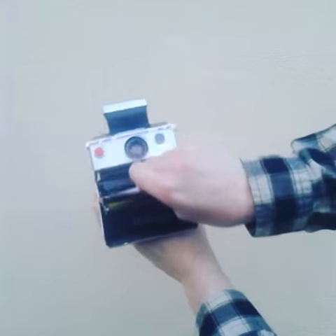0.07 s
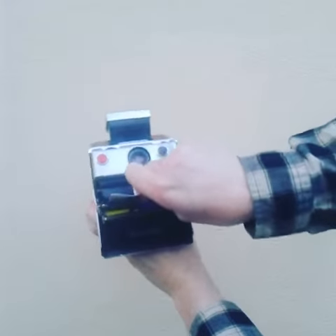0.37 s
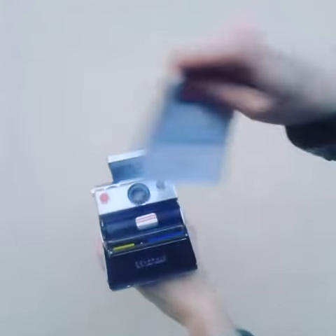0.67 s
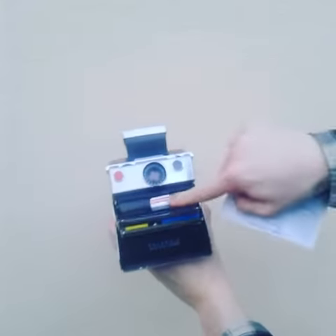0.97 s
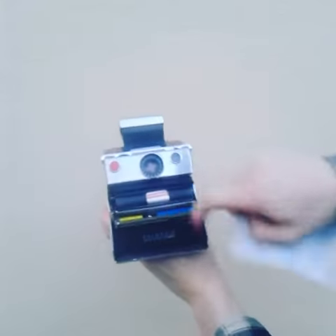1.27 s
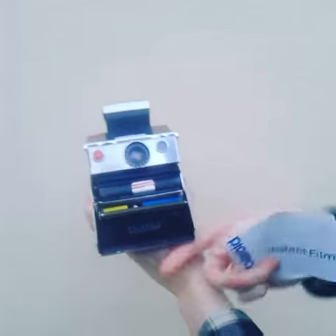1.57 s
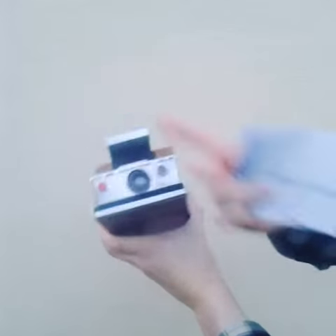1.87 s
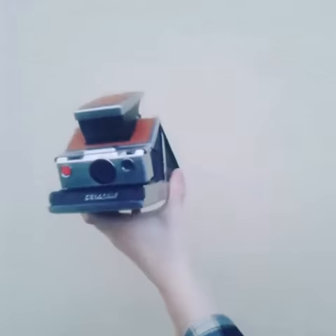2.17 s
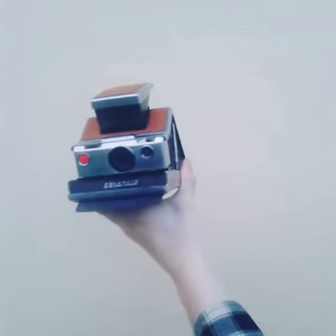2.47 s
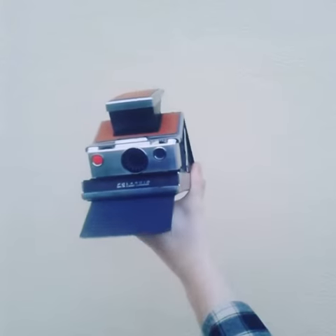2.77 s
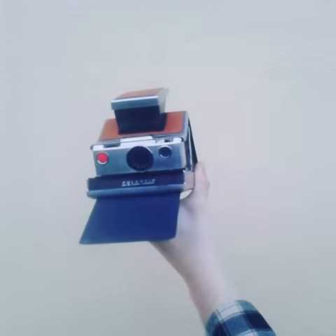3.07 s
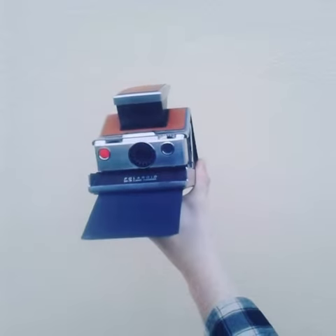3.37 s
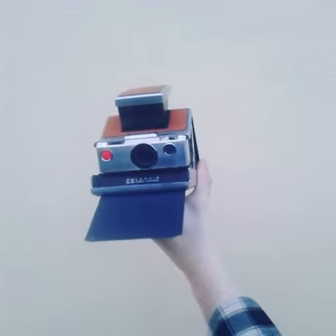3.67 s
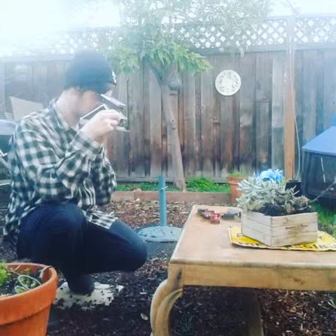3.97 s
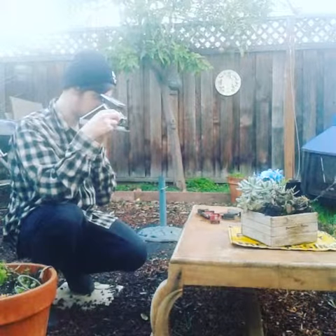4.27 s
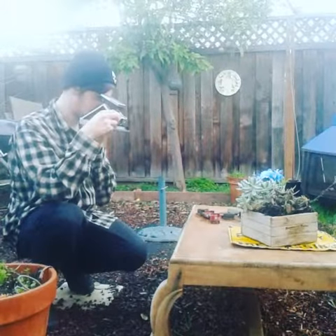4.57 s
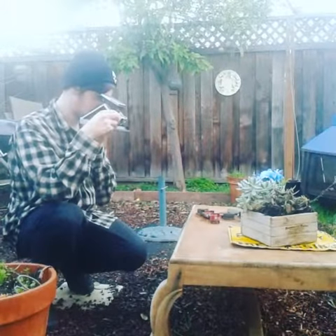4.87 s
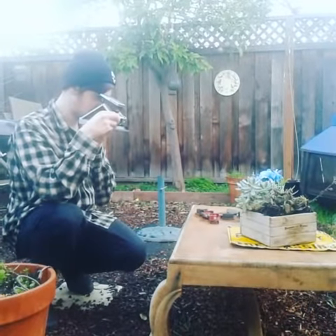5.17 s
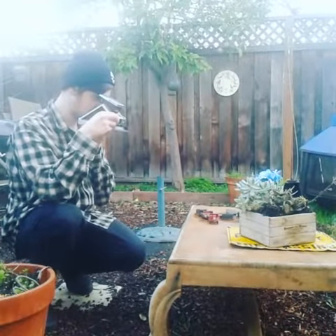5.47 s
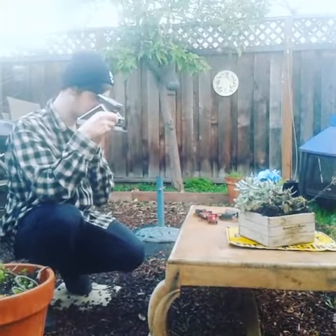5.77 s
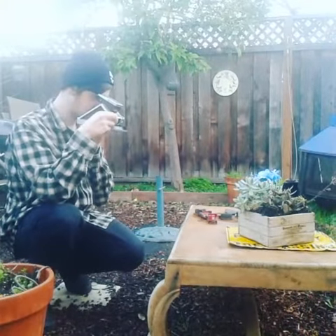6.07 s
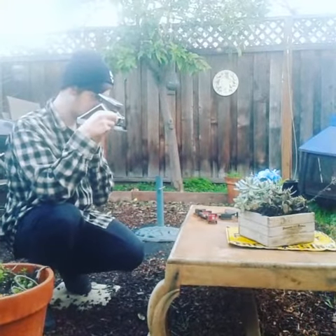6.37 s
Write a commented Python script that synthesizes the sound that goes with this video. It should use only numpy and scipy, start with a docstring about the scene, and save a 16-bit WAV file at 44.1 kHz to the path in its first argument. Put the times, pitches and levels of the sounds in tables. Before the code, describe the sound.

Close to the microphone in a quiet room, hands work an instant camera with light plastic clicks, taps and a sliding, flicking card. Its door snaps shut with a loud clack, and a small motor whines and rattles through its gears, pushing out a sheet before stopping with sharp clicks. The room cuts off, and a quiet back yard fades in with faint, distant traffic.

```python
"""Close plastic clicks and a sliding, flicking card: hands work a folding instant camera and snap its
front door shut, each contact ringing the shell and knocking the hollow body. A small motor hums and winds
a whining, rattling gear train, pushes a sheet through the rollers, trips a lever and stops, leaving a
spring ringing. The room tone cuts off and a quiet back yard fades in, with far traffic droning."""
import sys
import numpy as np
from scipy import signal
from scipy.fft import rfft, irfft, next_fast_len
from scipy.io import wavfile
from scipy.ndimage import uniform_filter1d, map_coordinates

SR = 44100
rng = np.random.default_rng(int(sys.argv[2]) if len(sys.argv) > 2 else 0)


def wav_record(signal):
    """Record a signal, one row per channel, as 16-bit PCM in the file named by sys.argv[1]."""
    frames = np.transpose(np.atleast_2d(signal))
    bounded = np.clip(frames, -1, 1)
    # unit amplitude maps onto the largest positive 16-bit level
    quanta = np.round(bounded * 32767).astype(np.int16)
    wavfile.write(sys.argv[1], SR, quanta)


N = 283563

# The motor sags under load and races once the sheet is free: (time [s], speed [turns/s])
MOTOR_SPEED = [(1.84, 147), (1.92, 160), (2.0, 180), (2.04, 171), (2.09, 178), (2.15, 145.6), (2.22, 180),
               (2.28, 158), (2.41, 173.6), (2.56, 164), (2.7, 171), (2.92, 173.6), (3.08, 193.6),
               (3.33, 196), (3.42, 175)]
# Wind-up, pick-up, rollers bite, hum drops out, sheet rolls, edge passes, sheet free, run-out, slack:
# (start [s], rattle [dB], whine [dB], second tooth harmonic boost [dB], hum at median speed [dB])
MOTOR_STAGES = [(1.83, -41, -46.5, -1, -56), (2.05, -37, -32, -2.5, -45.5), (2.18, -36, -35.5, 6, -46.5),
                (2.43, -35, -40, 4, -70), (2.57, -35.6, -36, -4, -45), (2.91, -34, -38.5, -4, -44.5),
                (3.03, -37, -35, -8, -46), (3.22, -36.5, -34, -9, -50.5), (3.335, -36, -41, -6, -57.5)]
# Shaft buzz: (multiple of the turn rate, relative level [dB])
SHAFT_HARMONICS = [(4, -26.5), (7, -24.5), (8, -30), (9, -25), (11, -23), (12, -19.5), (13, -21.5),
                   (14, -25)]
# Gear whine: (multiple of the tooth rate, relative level [dB])
TOOTH_HARMONICS = [(1, -10), (2, -7), (3, 1), (6, 1)]
# Gear frame resonances: (frequency [Hz], width [Hz], gain [dB])
FRAME_MODES = [(2343, 400, 0.5), (4155, 530, 1), (6250, 330, 0)]
# Hard hits of latches, door and levers:
# (time [s], shell ring [dB], hollow knock [dB], crack [dB], ring centre [Hz], knock centre [Hz])
HARD_HITS = [(0.001, -27, -55, -37.5, 2100, 590), (0.1556, -26.5, -40.5, -33.5, 2580, 650),
             (0.5401, -36, -24.5, -38, 2457, 900), (0.5478, -15.5, -30, -29, 4210, 800),
             (0.566, -37, -40.5, -50.5, 5770, 520), (0.8324, -32.5, -48, -43, 2030, 480),
             (1.171, -27, -38, -37, 3330, 690), (1.18, -36, -37, -36, 4270, 490),
             (1.199, -44, -49, -44.5, 3940, 470), (1.324, -30, -58, -44, 3400, 660),
             (1.331, -28.5, -44.5, -25.5, 2230, 590), (1.815, -30.5, -55.5, -43, 4927, 350),
             (1.829, -11.5, -17, -20, 2362, 456), (1.84, -13, -24, -22.5, 2245, 484),
             (1.849, -28, -27.5, -35.5, 2415, 420), (1.9494, -21, -35, -29, 3000, 573),
             (2.045, -15.5, -16, -29.5, 2200, 470), (2.0518, -18.5, -21, -36, 3284, 480),
             (2.123, -23.5, -36, -31, 4870, 451), (2.9248, -19, -36.5, -27.5, 4064, 450),
             (2.947, -20.5, -32.5, -33, 3280, 520), (2.9939, -10.5, -31.5, -26.5, 2426, 616),
             (3.0142, -12, -33.5, -21.5, 2000, 430), (3.3276, -15, -33.5, -20.5, 4670, 860)]
# Soft fingertips on the shell: (time [s], ring level [dB])
FINGER_TAPS = [(0.103, -41.5), (0.6084, -40.5), (0.728, -43.5), (0.7596, -42), (0.876, -35.5),
               (0.887, -36.5), (0.931, -44), (0.956, -42.5), (0.9895, -44.5), (1.318, -38.5), (1.54, -51.5)]
# The card snapping past an edge: (time [s], relative level [dB], pitch [Hz])
CARD_FLICKS = [(0.1952, -20.5, 2570), (0.2188, -26.5, 2500), (0.2374, -35.5, 2570), (0.241, -37, 2540),
               (0.541, -20.5, 847), (0.661, -29.5, 2440), (0.6753, -35.5, 2520), (0.682, -38, 2310)]
# The card's ring: (multiple of the pitch, relative level [dB], t60 [s])
CARD_MODES = [(.94, 2.5, 0.035), (1, 2, 0.033), (1.07, 3.5, 0.029), (1.76, -5, 0.038), (1.86, 3, .018),
              (2.25, -1, 0.015), (2.6, 0, 0.02), (3, -2, .01)]
# Struck parts: (frequency [Hz], relative level [dB], t60 [s])
SHELL_MODES = [(1350, -8.5, 0.028), (1600, -2.5, 0.042), (1778, -5.5, 0.063), (2074, 0.5, 0.018),
               (2255, -5, 0.061), (2597, -6, 0.068), (3000, -9, .03), (3540, -1, 0.022), (3580, -1, 0.024),
               (4410, -3.5, .025), (5294, 1, 0.031), (5560, -1.5, 0.023), (6235, 4, 0.039),
               (6460, -0.5, 0.033), (7370, -3.5, 0.067)]
BODY_MODES = [(195.7, -11, .06), (259.4, -3.5, 0.056), (339.5, -2.5, 0.061), (438, -1, 0.041),
              (520, -2, 0.027), (627, -4, 0.04), (885, 0, 0.018)]
LEVER_MODES = [(1596, 0.5, .12), (1654, -5.5, 0.087), (2115, -9.5, 0.059)]
SPRING_MODES = [(1836, -1.5, .4), (2207, -5.5, 1.9), (3702, -0.5, .33), (4766, -1, 0.31)]
# Friction gestures: (start [s], length [s], level [dB])
SHELL_STROKES = [(0.134, 0.031, -43), (0.28, 0.084, -61), (0.514, 0.037, -37.5), (0.7, .26, -61),
                 (0.765, 0.046, -55.5), (1.165, .006, -35.5), (1.305, 0.064, -58.5), (1.435, 0.015, -49.5),
                 (1.41, .08, -61)]
YARD_RUSTLES = [(4.29, .03, -74.5), (4.89, 0.036, -72)]
# Noise colours: (frequency [Hz], relative density [dB])
HOUSING_SPECTRUM = [(60, -10), (150, -8), (420, -10), (620, -13.5), (1020, -11.5), (1600, -3), (2300, -0.5),
                    (2800, -7.5), (3150, -8.5), (3700, -4), (4700, -5.5), (5700, -1), (6400, -5.5),
                    (7000, -8), (10000, -13.5), (13000, -20.5), (16000, -26)]
CRACK_SPECTRUM = [(1000, -20), (5000, -8.5), (7500, -0.5), (11000, -2), (16000, -15)]
CLATTER_SPECTRUM = [(150, -23.5), (700, -5.5), (1500, 0.5), (6500, -1.5), (8000, -9), (16000, -29)]  # the shell's dense, dead ringing
SCRAPE_SPECTRUM = [(200, -21), (700, -3.5), (1300, -3.5), (2400, 0.5), (3200, -2.5), (4500, -1),
                   (6400, 0.5), (8000, -10.5), (16000, -19)]
ROOM_SPECTRUM = [(25, -19.5), (55, 1), (120, 0.5), (200, -1), (340, -6), (600, -13), (900, -10),
                 (1500, -18), (2900, -28.5), (6400, -34), (16000, -37.5)]
YARD_SPECTRUM = [(15, -71), (25, -41), (36, -25), (59, -4.5), (92, -5.5), (157, -3.5), (200, -11.5),
                 (326, -16.5), (394, -22.5), (754, -17.5), (818, -19), (1070, -20), (2610, -36.5),
                 (14800, -46.5), (16000, -49)]
TRAFFIC_SPECTRUM = [(90, -40), (120, 6.5), (138, -24), (160, 10), (182, -19), (230, -40), (600, -100)]
# Reverb off the walls: (frequency [Hz], t60 [s])
WALL_DECAY = [(200, 0.36), (2000, 0.24), (10000, 0.046)]


def motor():
    """A three-pole motor hums, louder as load slows it; its twelve-tooth pinion drives the gears."""
    start_s, stop_s, coast_db_per_s, hum_db_per_lost_hz = 1.83, 3.345, 402, 0.22
    size = 2 * SR
    t = start_s + np.arange(size) / SR
    speed = np.interp(t, *np.transpose(MOTOR_SPEED))
    rattle_db, whine_db, boost_db, hum_db = stages(MOTOR_STAGES, t)
    running = amp(-coast_db_per_s * np.maximum(t - stop_s, 0))
    angle = 2 * np.pi * np.cumsum(speed) / SR
    strain_db = hum_db_per_lost_hz * (np.median(speed) - speed)
    hum = np.sqrt(2) * amp(hum_db + strain_db) * np.sin(3 * angle)
    shaft = sum(amp(db + 3.1 * wobble(17, size)) * np.sin(k * angle + 0.76 * wobble(35, size))
                for k, db in SHAFT_HARMONICS)
    teeth = 12 * angle
    # teeth meet early or late, and an off-centre pinion sways them once a turn
    backlash = .45 * wobble(80, size) + .42 * wobble(600, size) + .35 * np.sin(angle)
    whine = amp(whine_db) * gear_whine(teeth, backlash, boost_db)
    rattle = amp(rattle_db) * (gear_rattle(angle, teeth + backlash) + 1.86 * shaft)
    out = np.zeros(N)
    add(out, start_s, running * (hum + whine + rattle))
    return out


def gear_whine(teeth, backlash, boost_db):
    """Meshing teeth sing a raspy tone through the gear frame's resonances."""
    size = len(teeth)
    mesh = np.zeros(size)
    for k, db in TOOTH_HARMONICS:
        tone = np.sin(k * (teeth + backlash)) * amp(1.5 * wobble(200, size))
        rasp = .65 * wobble(650, size) * np.cos(k * teeth)
        mesh += amp(db + boost_db * (k == 2)) * (tone + rasp)
    return filtered(mesh, lambda hz: resonances(FRAME_MODES, hz))


def gear_rattle(angle, tooth_phase):
    """Each tooth knocks the housing at its own strength, harder once a turn; worn spots come round."""
    size = len(angle)
    flaws = rng.standard_normal(256)
    wear = np.interp(angle, np.linspace(0, 2 * np.pi, len(flaws), endpoint=False), flaws, period=2 * np.pi)
    grit = rng.standard_normal(size) + .4 * wear
    knocks = grit * (1 + 0.96 * np.cos(tooth_phase)) * amp(0.93 * wobble(830, size))
    return coloured(knocks, HOUSING_SPECTRUM) * amp(1.3 * np.sin(angle) + .9 * wobble(130, size))


def clacks():
    """Each latch hit or finger tap cracks, rings the shell and knocks the hollow body."""
    out, t = np.zeros(N), np.arange(SR // 12) / SR
    burst = attack(t, .0003) * (decay(t, 0.009) + amp(-14.5) * decay(t, 0.084))  # hit, then chatter
    taps = [(s, db, db - 4, db - 19.5, 2000, 430) for s, db in FINGER_TAPS]  # columns as in HARD_HITS
    for s, ring_db, knock_db, crack_db, ring_hz, knock_hz in HARD_HITS + taps:
        shell = ring(favouring(SHELL_MODES, ring_hz, db_per_octave=9.5), t, scatter_db=6.5)
        shell = unit_hit(shell * (1 + 2 * decay(t, 0.029)) * attack(t, 0.00057))
        clatter_colour = [(hz, db - 4 * abs(np.log2(hz / ring_hz))) for hz, db in CLATTER_SPECTRUM]
        clatter = unit_hit(noise(clatter_colour, len(t)) * burst)
        crack = unit_hit(noise(CRACK_SPECTRUM, len(t)) * burst * decay(t, .04))  # treble dies first
        body = ring(favouring(BODY_MODES, knock_hz, db_per_octave=10.5), t, scatter_db=4.5)
        knock = unit_hit(body * attack(t, 0.0012))
        ringing = unit_hit(shell + clatter)
        add(out, s, amp(ring_db) * ringing + amp(crack_db) * crack + amp(knock_db) * knock)
    return out


def card_flicks():
    """The stiff card snaps past an edge and rings briefly."""
    out, t = np.zeros(N), np.arange(SR // 10) / SR
    for s, db, pitch_hz in CARD_FLICKS:
        modes = [(k * pitch_hz, level, t60) for k, level, t60 in CARD_MODES]
        tone = unit_hit(ring(modes, t, scatter_db=5.0) * (1 + 0.56 * decay(t, 0.022)))
        snap = unit_hit(rng.standard_normal(len(t)) * decay(t, .008))
        add(out, s, amp(db - 5.5) * (tone + amp(-8.5) * snap))
    return out


def lever_and_spring():
    """The sheet trips a steel lever; the stop at the end of the cycle leaves a spring ringing."""
    out, t = np.zeros(N), np.arange(SR) / SR
    onset = attack(t, .0006)
    add(out, 3.015, amp(-19.5) * onset * ring(LEVER_MODES, t, scatter_db=1))
    add(out, 3.328, amp(-52.5) * onset * ring(SPRING_MODES, t, scatter_db=1))
    return out


def rubbing():
    """Card and fingers catch and slip over the shell in tiny grains."""
    attack_s, release_s = 0.0043, .009
    t = np.arange(N) / SR
    grains = rng.standard_normal(N) * amp(4.9 * wobble(2500))
    pressure = amp(2.4 * wobble(170))
    scrape = unit(coloured(grains, SCRAPE_SPECTRUM) * pressure)
    grip = amp(-63.5 - 7.5 * t)  # the shifting hand settles
    firm = swells(SHELL_STROKES, attack_s, release_s)
    brush = amp(-22) * swells(SHELL_STROKES, 3.6 * attack_s, 3.6 * release_s)  # soft edges of a stroke
    return np.sqrt(grip ** 2 + firm ** 2 + brush ** 2) * scrape


def room_reverb(x):
    """The walls answer, the treble dying first."""
    hz, t, spectra = signal.stft(rng.standard_normal(SR // 2), SR, nperseg=256)
    tail = signal.istft(spectra * decay(t, along(WALL_DECAY, hz)[:, None]), SR, nperseg=256)[1]
    return signal.fftconvolve(np.pad(x, (200, 0)), tail / np.linalg.norm(tail))[:N]


def yard():
    """Open air and the wavering drone of far traffic fade in and slowly swell, with faint rustles."""
    start_s, fade_s, swell_db_per_s = 4.025, 0.27, 1.34
    t = np.arange(N) / SR - start_s
    fader = np.clip(t / fade_s, 0, 1) ** 1.15 * amp(-55.5 + swell_db_per_s * t)
    air = amp(0.34 * wobble(14)) * noise(YARD_SPECTRUM)
    traffic = amp(-2.5 + 1.47 * wobble(7.4)) * noise(TRAFFIC_SPECTRUM)
    rustle = noise(SCRAPE_SPECTRUM) * amp(2.5 * wobble(60))
    return fader * (air + traffic) + swells(YARD_RUSTLES, attack_s=0.023, release_s=0.077) * rustle


def amp(db):
    """Decibels to gain."""
    return 10 ** (np.asarray(db) / 20)


def attack(t, rise_s):
    """A rise towards 1 with time constant rise_s."""
    return 1 - np.exp(-t / rise_s)


def decay(t, t60):
    """A fall of 60 dB every t60 seconds."""
    return amp(-60 * t / t60)


def unit(x):
    """Scale to rms 1."""
    return x / np.sqrt(np.mean(x ** 2) + 1e-20)


def unit_hit(x):
    """Scale a hit to the energy of one millisecond at level 1."""
    return x / np.sqrt(np.sum(x ** 2) * 1000 / SR)


def along(points, hz):
    """Read (frequency [Hz], value) points on a log axis."""
    freqs, values = np.transpose(points)
    return np.interp(np.log(hz + 1), np.log(freqs + 1), values)


def wobble(rate, size=N):
    """Smooth random modulation with rate knots a second."""
    knots = rng.standard_normal(int(size * rate / SR) + 4)
    fine = np.arange(0, len(knots) - 1, 1 / 6)
    return np.interp(np.arange(size) * rate / SR, fine, map_coordinates(knots, [fine]))


def filtered(x, response):
    """EQ x with a gain that is a function of frequency."""
    size = next_fast_len(len(x) + 8192)
    return irfft(rfft(x, size) * response(np.fft.rfftfreq(size, 1 / SR)), size)[:len(x)]


def coloured(x, spectrum):
    """Shape x with a spectrum, at rms 1."""
    return unit(filtered(x, lambda hz: amp(along(spectrum, hz))))


def noise(spectrum, size=N):
    """Coloured noise at rms 1."""
    return coloured(rng.standard_normal(size), spectrum)


def add(track, s, sound):
    """Mix a sound in at time s."""
    part = track[round(s * SR):][:len(sound)]
    part += sound[:len(part)]


def ring(modes, t, scatter_db):
    """Damped modes, struck at new strengths and phases each time."""
    hz, db, t60 = np.transpose(modes)[:, :, None]
    strength = amp(db + scatter_db * rng.standard_normal(hz.shape))
    phase = rng.uniform(0, 2 * np.pi, hz.shape)
    return np.sum(strength * decay(t, t60) * np.sin(2 * np.pi * hz * t + phase), axis=0)


def resonances(modes, hz):
    """Response of broad band-pass modes in alternating polarity."""
    return sum((-1) ** k * amp(db) * 1j * hz * width / (centre ** 2 - hz ** 2 + 1j * hz * width)
               for k, (centre, width, db) in enumerate(modes))


def favouring(modes, centre_hz, db_per_octave):
    """Where a hit lands favours the modes near one pitch."""
    return [(hz, db - db_per_octave * abs(np.log2(hz / centre_hz)), t60) for hz, db, t60 in modes]


def swells(gestures, attack_s, release_s):
    """Attack, hold and release envelopes, summed in power."""
    t, power = np.arange(N) / SR, np.zeros(N)
    for start, length, db in gestures:
        before, after = np.maximum(start - t, 0), np.maximum(t - start - length, 0)
        power += (amp(db) * np.exp(-before / attack_s - after / release_s)) ** 2
    return np.sqrt(power)


def stages(rows, t, blend_s=.04):
    """Each column holds its value through a stage, then blends into the next."""
    starts, *columns = np.transpose(rows)
    stage = np.maximum(np.searchsorted(starts, t) - 1, 0)
    return [uniform_filter1d(column[stage], int(blend_s * SR)) for column in columns]


def scene():
    """The camera in a quiet room, a moment of silence, then the yard."""
    cut_s, fade_s = 3.722, .04
    camera = motor() + clacks() + card_flicks() + rubbing() + lever_and_spring()
    room_tone = amp(-54) * noise(ROOM_SPECTRUM)
    indoors = camera + amp(-19.5) * room_reverb(camera) + room_tone
    fader = np.clip((cut_s - np.arange(N) / SR) / fade_s, 0, 1)
    return (indoors * fader + yard())[None]


def record(dry):
    """The small microphone loses the deep bass and keeps nothing above its band limit."""
    low_hz, top_hz = 48, 16100
    return np.array([filtered(x, lambda hz: (hz < top_hz) * hz ** 3 / np.sqrt(hz ** 6 + low_hz ** 6))
                     for x in dry])


dry = scene()
out = record(dry)
wav_record(out)
```